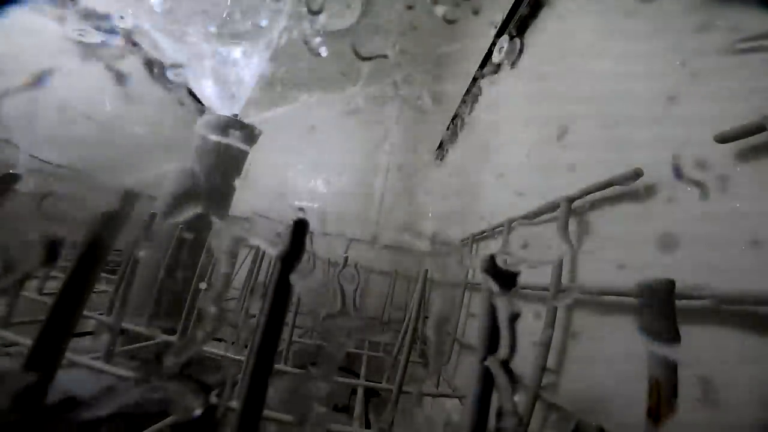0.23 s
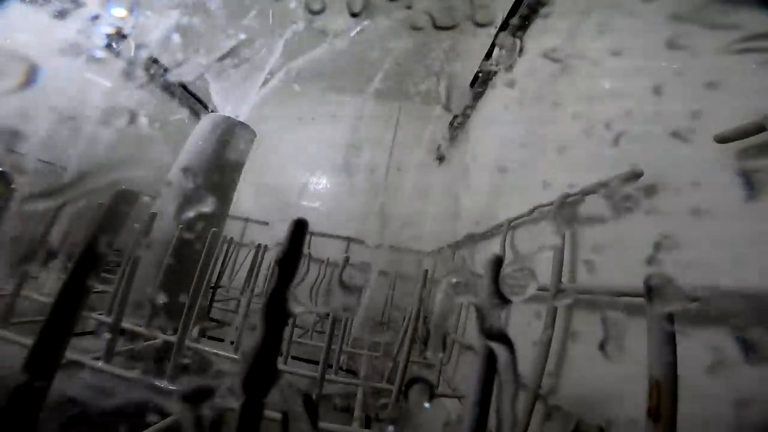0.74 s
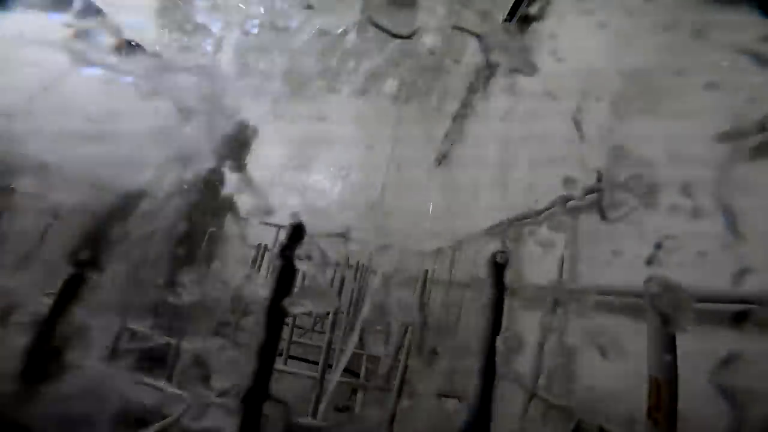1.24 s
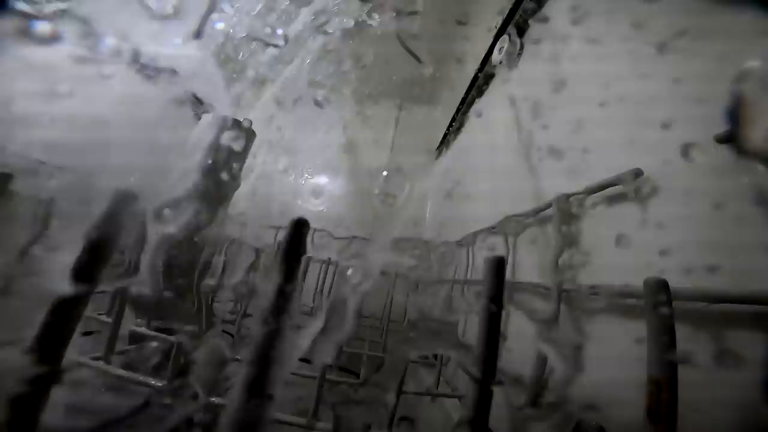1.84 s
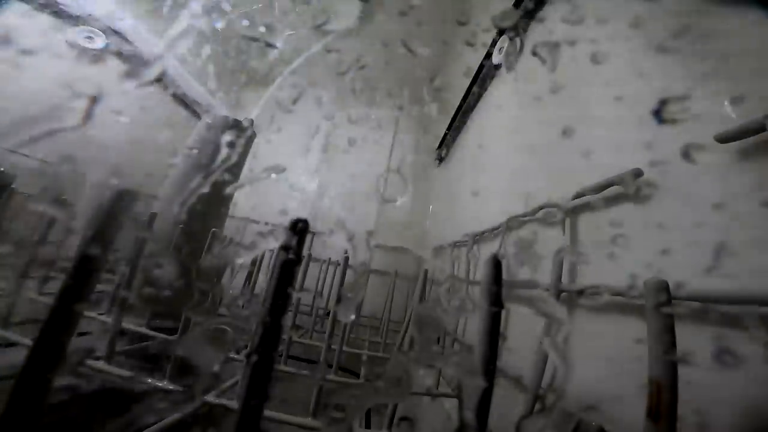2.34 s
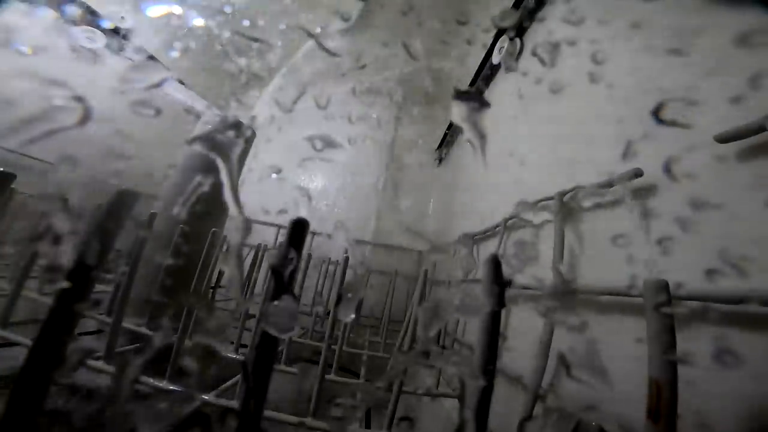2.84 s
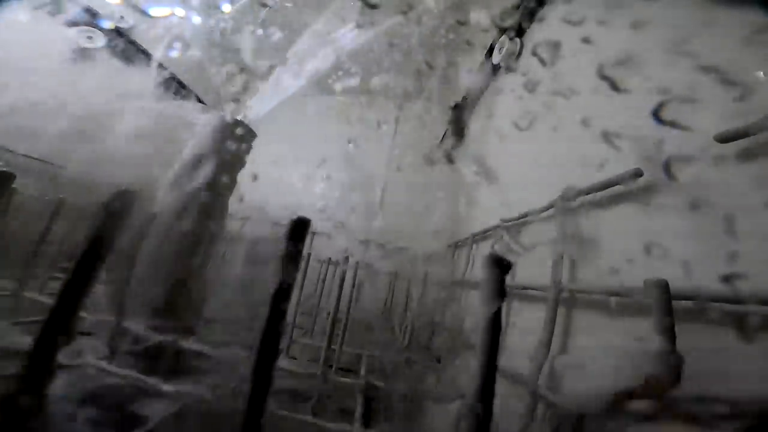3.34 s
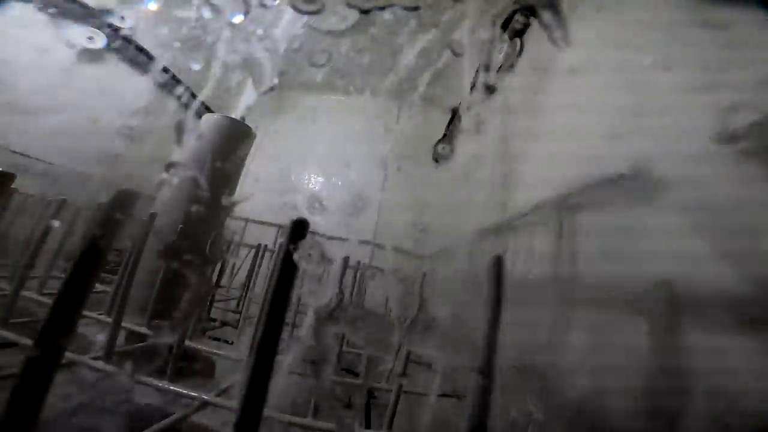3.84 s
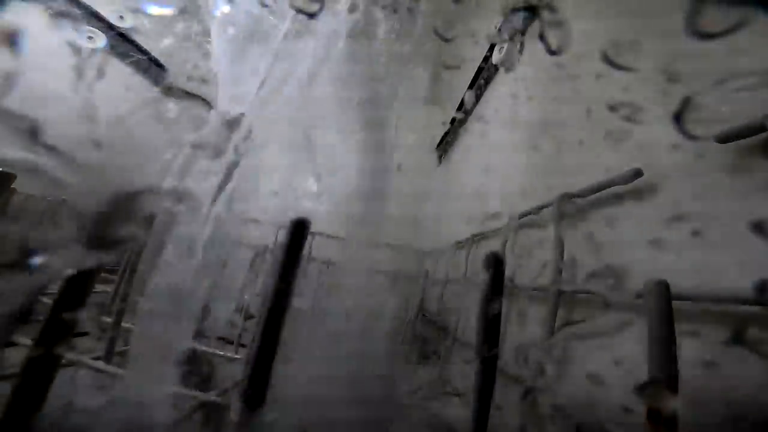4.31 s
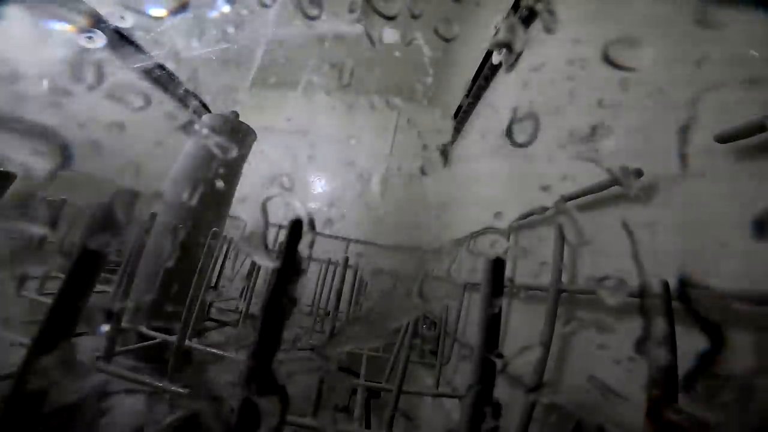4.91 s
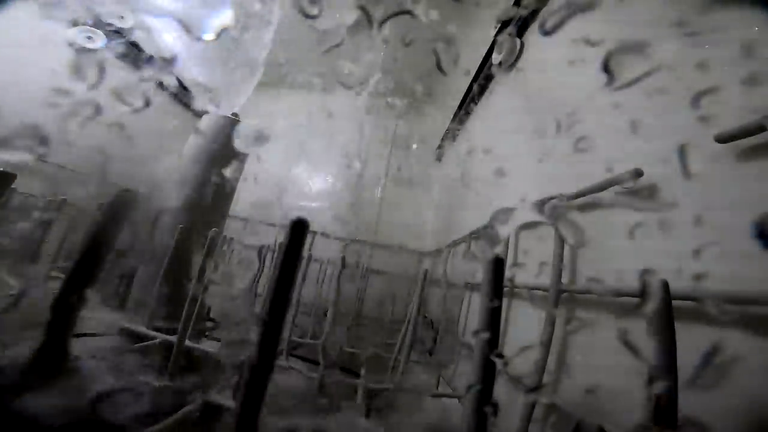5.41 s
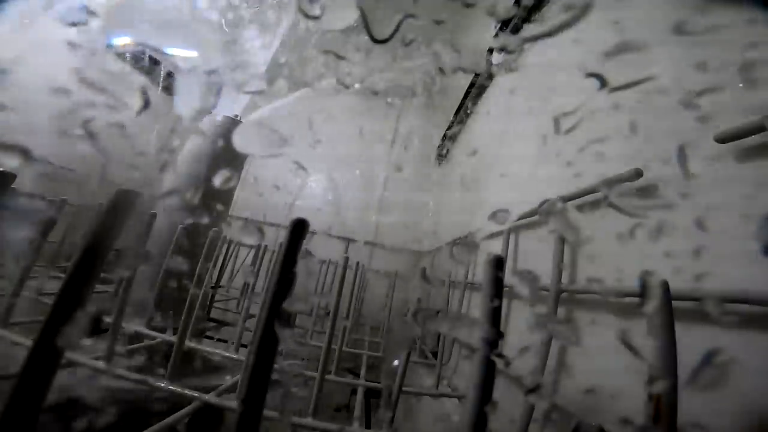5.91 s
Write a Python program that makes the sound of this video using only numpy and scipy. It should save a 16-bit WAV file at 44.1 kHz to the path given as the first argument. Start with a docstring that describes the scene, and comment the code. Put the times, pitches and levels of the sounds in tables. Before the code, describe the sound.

From inside a running dishwasher, a low wavering pump hum and tub rumble under dense spray patter, with wet plops and sharp gouts smacking the housing.

```python
"""Inside a running dishwasher

We listen through a watertight camera housing in the rack. Wavering tones make the pump hum and whine;
noise and random drops, passed through resonances, make the tub rumble, the walls drum and the wash rush.
Coloured drops make the spray, which swells as an arm turns and shifts as jets sweep close.
Short tones and noise bursts make plops, bubbles, clicks, gushes and gouts that splat and ring."""
import sys
import numpy as np
from scipy import signal
from scipy.fft import rfft, irfft
from scipy.io import wavfile
from scipy.ndimage import map_coordinates

SR = 44100
rng = np.random.default_rng(int(sys.argv[2]) if len(sys.argv) > 2 else 0)


def generate_wav(signal):
    """Clip the signal to [-1, 1] and save it as 16-bit WAV at the path in sys.argv[1]."""
    frames = np.transpose(np.atleast_2d(signal))
    scaled = np.clip(frames, -1, 1) * 32767
    pcm = np.round(scaled).astype(np.int16)
    wavfile.write(sys.argv[1], SR, pcm)


N = 271656
TIME = np.arange(N) / SR

# Pump tones, before they waver: (pitch [Hz], level against the hum [dB])
PUMP_TONES = [(120.3, 0.5), (60.34, -12)]
# The hum level rises and falls unevenly: (time [s], level [dB])
HUM_LEVELS = [(0.0, -31), (0.6, -34), (1.03, -28.5), (1.1, -31.5), (2.74, -35), (3.84, -29), (4.3, -34),
              (5.65, -37.5), (5.75, -32), (5.95, -42.5), (6.06, -32.5), (6.16, -35.5)]
# The impeller whine clears when the pump runs freely: (time [s], level [dB])
WHINE_LEVELS = [(0, -49.5), (1.2, -48.5), (2.4, -53), (4.4, -54.5), (4.849, -48.5), (6.16, -50.5)]
# Tub and rack resonances: (pitch [Hz], width [Hz], gain against each other [dB])
TUB_MODES = [(39, 3.7, 0), (60.1, 5.6, -6), (78.3, 20, -7), (102, 34, -14.5)]
# Water sloshes in the bottom of the tub: (time [s], half length [s], rise [dB])
SLOSHES = [(0.03, 0.045, 12), (2.007, 0.2, 7), (2.744, 0.078, 4.5), (4.64, .09, 5), (5.77, 0.22, 6)]
# Wall panel resonances: (pitch [Hz], width [Hz], gain against each other, before it wanders [dB])
WALL_MODES = [(142.1, 11, 3.5), (161.3, 7.7, 8), (180, 39.6, -1.5), (219.7, 30.6, -4.5),
              (263.6, 19.8, -1.5), (289.7, 64, -7), (388.6, 54.7, -4.5)]
# Resonances of the wash, before they slide and wander:
# (pitch [Hz], width [Hz], gain against each other [dB])
WASH_MODES = [(494, 56, -2), (584, 68, 2.5), (685.6, 39, 0), (826, 81, -7)]
# A jet sweeps close; a negative rise is a dip, and the mist takes only a share of the spray rise:
# (time [s], half length [s], spray rise [dB], wash rise [dB])
SWEEPS = [(0.06, 0.019, -3, 11.5), (0.4, 0.09, 3.5, -4), (0.617, 0.21, 2.5, 5.5), (1.475, 0.047, 2.5, 9),
          (1.654, 0.085, 2.5, 1), (2.407, 0.12, 3.5, 0.5), (3.245, 0.098, 1.5, 3.5), (3.634, 0.14, 2, 5),
          (3.79, 0.13, 0.5, -5.5), (4.31, 0.21, 5, 1.5), (4.558, 0.069, 0.5, 8), (4.732, 0.078, 6.5, 2),
          (6.02, 0.33, 5.5, 4)]
# The jets point away and the water thins; layers may scale the dip:
# (time [s], half length [s], dip [dB])
LULLS = [(4.203, 0.079, -4), (5.205, 0.35, -3.5)]
# Colour of the spray through the housing: (pitch [Hz], gain [dB])
SPRAY_COLOUR = [(700, -9), (1000, 0), (1280, 2.5), (1400, 5), (1580, 9.5), (1740, -2), (2000, 1),
                (2400, -3.5), (2700, -10), (3300, -24.5)]
# Colour of fine drops on the housing: (pitch [Hz], gain [dB])
MIST_COLOUR = [(1000, 3), (2400, 10.5), (3700, -1), (4450, 2.5), (5100, -7), (6000, -11), (7300, -9.5),
               (8600, -14), (9900, -25.5), (10900, -19), (12400, -27), (14200, -36)]
# Colour of a bursting gout: (pitch [Hz], gain [dB])
SPLASH_COLOUR = [(450, 9), (950, -10), (1400, 10), (2300, 5), (3200, -0.5), (3800, -4), (4500, -4),
                 (6000, -17.5), (8500, -19), (9900, -31), (12300, -29), (14500, -42)]
# Sheets of a jet brush the housing; gushes() trims the levels:
# (time [s], level before the trim [dB], swell time [s])
GUSHES = [(0.0604, -28, 0.0098), (0.595, -50, 0.0067), (1.63, -40, 0.016), (1.715, -43, 0.02),
          (3.22, -39.5, 0.033), (3.31, -35, .004), (3.6, -31, 0.005), (3.67, -38, 0.04), (3.81, -52, 0.028),
          (4.045, -35.5, 0.03), (4.176, -37, 0.016), (4.2584, -34, 0.01), (4.364, -32, 0.0093),
          (4.613, -28, 0.012), (4.675, -39, 0.0083), (4.728, -30, 0.018)]
# Sharp bright clicks, alone or at the contact of a gout, each peaking FLATTEN_S after its time;
# ticks() trims the levels: (time [s], level before the trim [dB])
TICKS = [(0.052, -42), (0.7012, -41), (0.914, -38.5), (1.46, -53), (1.5034, -38), (2.0305, -43),
         (2.5442, -45), (3.1821, -43.5), (3.2815, -40), (3.309, -39), (3.5425, -45), (3.5995, -50),
         (3.696, -43.5), (4.0845, -40), (4.3745, -45), (4.394, -44), (5.2246, -41), (5.268, -51),
         (5.5429, -40), (5.733, -46.5), (5.866, -45)]
# Gouts and beads first touch the housing; splats() trims the levels:
# (time [s], ring level before the trim [dB], ring pitch at the peak [Hz], splash level before the trim [dB])
SPLATS = [(0.0594, -39, 1954, -40.5), (0.647, -24.5, 1526, -56), (1.36, -28, 1530, -47),
          (1.3712, -22.5, 1544, -47), (1.4457, -19, 1394, -40), (1.614, -25, 1400, -44),
          (1.632, -21, 1402, -38.5), (1.6476, -37, 3600, -45), (2.026, -27, 1430, -38.5),
          (2.1725, -33, 1450, -48), (2.179, -19.5, 1330, -42), (2.2009, -18.5, 1403, -47),
          (2.2017, -27, 2350, -51), (2.4095, -25, 1402, -58), (2.5262, -28, 1367, -41.5),
          (3.182, -24, 1480, -44), (3.282, -26, 1312, -39), (3.308, -35, 3660, -36), (3.6, -35, 5000, -39),
          (3.6197, -29, 4500, -49), (3.629, -31, 1695, -43), (3.6368, -15.5, 1295, -37.5),
          (3.6777, -36, 2400, -37.5), (3.7289, -17.5, 1297, -42.5), (3.7627, -23.5, 1427, -53),
          (3.7885, -27, 2400, -31.5), (3.8147, -33, 1625, -48), (3.8258, -27, 2820, -35),
          (3.841, -23, 1310, -39), (3.8735, -26.5, 3000, -35.5), (3.8828, -33, 4280, -46),
          (3.924, -23.5, 1256, -43), (3.9936, -30, 1647, -35), (4.0224, -16.5, 1340, -46),
          (4.032, -20, 1373, -54), (4.0386, -33.5, 5000, -38), (4.058, -23, 1573, -36),
          (4.0897, -19.5, 2290, -34), (4.1718, -24.5, 1420, -46), (4.175, -22, 1990, -39.5),
          (4.249, -30, 3500, -44), (4.262, -35, 4000, -45), (4.351, -28, 1476, -40),
          (4.3654, -24, 2045, -40.5), (4.604, -24, 1580, -48), (4.6156, -16, 1680, -31.5),
          (4.718, -20, 1590, -51), (4.727, -23.5, 1947, -43), (5.0454, -23, 1340, -58),
          (5.057, -17.5, 1420, -43), (5.225, -17.5, 1374, -56), (5.268, -21, 1300, -42.5),
          (5.4607, -38, 4850, -53), (5.542, -23, 1275, -38), (5.946, -19.5, 1280, -50),
          (5.9492, -17.5, 1355, -40.5), (6.0213, -23, 1500, -47)]

WHINE_HZ = 407.7
# levels before each layer's swells and dips
CHURN_DB, DRUM_DB, WASH_DB, SPRAY_DB, MIST_DB = -38.5, -37, -49, -46, -51
# one arm throws spray at the housing each time it comes round
SPRAY_PERIOD_S, SPRAY_PEAK_S, SPRAY_SWING_DB = 1.865, 1.5, 1.9
# a lump of water presses hardest this long after it first touches
FLATTEN_S = 0.001486
TOP_HZ = 15000


def undb(db):
    """Turn decibels into a gain."""
    return 10 ** (np.asarray(db) / 20)


def unit(x):
    """Scale a sound to an average (rms) strength of 1."""
    return x / np.sqrt(np.mean(x ** 2))


def walk(rate):
    """A random wander with spread 1 that changes direction about rate times a second."""
    steps = rng.standard_normal(1024)
    return unit(np.interp(TIME * 2 * rate, np.arange(len(steps)), steps))


def pump(flutter_db=0.85, tone_waver_rad=0.18, whine_waver_rad=0.19):
    """Motor tones waver in phase and strength with the water load, beside an impeller whine."""
    tones = 0
    for hz, db in PUMP_TONES:
        phase = 2 * np.pi * hz * TIME + tone_waver_rad * walk(2)
        tones = tones + undb(db + flutter_db * walk(11)) * np.sin(phase)
    hum = tones * undb(np.interp(TIME, *np.transpose(HUM_LEVELS)))
    whine_db = np.interp(TIME, *np.transpose(WHINE_LEVELS))
    whine = undb(whine_db) * np.sin(2 * np.pi * WHINE_HZ * TIME + whine_waver_rad * walk(2.7))
    # a sine of height sqrt(2) has rms 1
    return np.sqrt(2) * (hum + whine)


def resonate(x, hz, width):
    """A resonance with steep skirts, made of two equal filters; gain 1 at its centre."""
    # two passes narrow the peak, so each one starts out wider
    b, a = signal.iirpeak(hz, hz / (1.55 * width), fs=SR)
    once = signal.lfilter(b, a, x)
    return signal.lfilter(b, a, once)


def passing(at, half_s):
    """A smooth swell to 1 and back."""
    return np.exp(-((TIME - at) / half_s) ** 2)


def tub():
    """Churning water, made of noise, shakes the lowest resonances of the tub."""
    rumble = 0
    for hz, width, db in TUB_MODES:
        rumble = rumble + undb(db) * resonate(rng.standard_normal(N), hz, width)
    slosh_db = sum(db * passing(at, half_s) for at, half_s, db in SLOSHES)
    return unit(rumble) * undb(CHURN_DB + slosh_db)


def drops(rate, spread_db):
    """Random impacts, about rate a second, of uneven size and either sign."""
    size = undb(spread_db * np.minimum(rng.exponential(size=N), 4))
    hit = rng.random(N) < rate / SR
    return unit(hit * size * rng.choice([-1, 1], N))


def lull():
    """Dip of the falling water while the jets point away, in dB."""
    return sum(db * passing(at, half_s) for at, half_s, db in LULLS)


def walls(wander_db=1, lull_share=1.1):
    """Jets break into lumps that drum on the panels; the strength of each resonance wanders."""
    drumming = 0
    for hz, width, db in WALL_MODES:
        lumps = drops(rate=900, spread_db=1.5)
        drumming = drumming + undb(db + wander_db * walk(4.5)) * resonate(lumps, hz, width)
    return unit(drumming) * undb(DRUM_DB + lull_share * lull())


def drift(x, share, rate):
    """Pitches slide up and down, typically by this share, as the water film changes."""
    places = np.arange(N) + np.cumsum(share * walk(rate))
    return map_coordinates(x, [places], mode="mirror")


def wash_flow():
    """Water running over the rack as the jets sweep close, in dB."""
    return sum(db * passing(at, half_s) for at, half_s, _, db in SWEEPS)


def wash(lull_share=2.0, wander_db=1.4):
    """Sheets of water run over the rack: a hollow rush whose resonances swell and slide."""
    rush = 0
    for hz, width, db in WASH_MODES:
        water = drops(rate=1000, spread_db=3.0)
        rush = rush + undb(db + wander_db * walk(4)) * resonate(water, hz, width)
    sliding = unit(drift(rush, share=0.025, rate=2))
    return sliding * undb(WASH_DB + wash_flow() + lull_share * lull())


def colour(x, points):
    """Filter by a curve of (pitch [Hz], gain [dB]) points that falls away beyond its ends."""
    hz = np.arange(N // 2 + 1) * SR / N + 1e-3  # the tiny offset avoids log(0)
    at, db = np.transpose(points)
    ends = np.minimum(hz / at[0], 1) ** 3 * np.minimum(at[-1] / hz, 1) ** 3
    gain = undb(np.interp(np.log(hz), np.log(at), db))
    return irfft(rfft(x) * ends * gain, N)


def reflect(x, decay_s, wet_db):
    """The steel tub is a small hard box: a short dense echo builds up and lightly combs the sound."""
    t = np.arange(4096) / SR
    tail = rng.standard_normal(len(t)) * t * np.exp(-t / decay_s)
    echo = signal.fftconvolve(x, tail / np.linalg.norm(tail))[:N]
    return x + undb(wet_db) * echo


def turn(period_s, peak_s):
    """A steady rotation: 1 when it faces the housing, -1 half a period later."""
    return np.cos(2 * np.pi * (TIME - peak_s) / period_s)


def spray_flow():
    """Spray reaching the housing, as a change in dB: the turning arm and the close sweeps."""
    close = sum(db * passing(at, half_s) for at, half_s, db, _ in SWEEPS)
    return SPRAY_SWING_DB * turn(SPRAY_PERIOD_S, SPRAY_PEAK_S) + close


def shifting_echo(x):
    """Water heard with its echo in the tub, the pitches sliding as the water moves."""
    return unit(drift(reflect(x, decay_s=0.0042, wet_db=-9.5), share=0.04, rate=5))


def spray(surge_db=2.0, flicker_db=1.25, mist_share=0.53, patter_lull_share=0.62, mist_lull_share=1.0):
    """Dense patter and finer mist, both made of random drops, come in quick uneven surges."""
    patter = shifting_echo(colour(drops(rate=600, spread_db=0.4), SPRAY_COLOUR))
    mist = shifting_echo(colour(drops(rate=9000, spread_db=-0.5), MIST_COLOUR))
    flow_db, lull_db = spray_flow(), lull()
    patter_db = SPRAY_DB + flow_db + patter_lull_share * lull_db + surge_db * walk(22)
    mist_db = MIST_DB + mist_share * flow_db + mist_lull_share * lull_db + flicker_db * walk(45)
    return patter * undb(patter_db) + mist * undb(mist_db)


def contact(t, rise, fall):
    """Force of a lump of water: it builds as the lump flattens, then lets go; peak 1 at t = 0."""
    u = t / np.where(t < 0, rise, fall)
    return np.exp(1 - np.sqrt(1 + u ** 2))


def add(out, at, sound):
    """Mix a short sound in, centred on a time."""
    start = int(at * SR) - len(sound) // 2
    lo, hi = max(start, 0), min(start + len(sound), N)
    out[lo:hi] += sound[lo - start:hi - start]


def plop(hz, cycles):
    """One drop: a few cycles of tone that swell and die."""
    t = np.arange(-512, 512) / SR
    swell = contact(t, cycles / hz, cycles / hz)
    return swell * np.sin(2 * np.pi * (hz * t + rng.random()))


def plops(plop_db=-6.0, spread_db=3.5, clump_db=2.5, fall_db=-3.0, cycles=2, low_hz=1280, span=1.19,
          count=1300):
    """Single drops burst throughout, louder in clumps; higher ones tend to be quieter and are shorter."""
    out = np.zeros(N)
    flow_db = SPRAY_DB + spray_flow() + clump_db * walk(7.9)
    for when, pitch, size in rng.random((count, 3)):
        octaves = span * pitch ** 2  # squaring favours low pitches
        size_db = spread_db * min(-np.log(1 - size), 4)  # a few drops are much louder
        db = flow_db[int(when * N)] + plop_db + fall_db * octaves + size_db
        add(out, when * N / SR, undb(db) * plop(low_hz * 2 ** octaves, cycles))
    return out


def bubbles(bubble_db=2.0, spread_db=2.5, fall_db=-6, low_hz=1450, span=1.0, cycles=13, rise_per_s=2.2,
            count=240):
    """Trapped air rings in the running film of water, each bubble rising in pitch as it fades."""
    t = np.arange(-2048, 2048) / SR
    out = np.zeros(N)
    flow_db = SPRAY_DB + spray_flow() + lull()
    for when, pitch, size in rng.random((count, 3)):
        octaves = span * pitch ** 2
        hz = low_hz * 2 ** octaves
        size_db = spread_db * min(-np.log(1 - size), 2)
        db = flow_db[int(when * N)] + bubble_db + fall_db * octaves + size_db
        tone = np.sin(2 * np.pi * hz * (t + rise_per_s * t ** 2 / 2))
        add(out, when * N / SR, undb(db) * contact(t, 1 / hz, cycles / hz) * tone)
    return out


def flecks(fleck_db=-61, spread_db=4.0, rate=70):
    """Stray droplets click on the housing at random, harder when the spray is thick."""
    droplets = colour(drops(rate=rate, spread_db=spread_db), MIST_COLOUR)
    clicks = np.gradient(droplets)  # the slope of a sound is brighter than the sound
    return unit(clicks) * undb(fleck_db + spray_flow() + lull())


def gushes(gush_db=-7, spread_db=5.0, cutoff_share=0.31):
    """A jet brushes past: a ragged burst of drops that builds and breaks off faster."""
    t = np.arange(-8192, 8192) / SR
    flow = np.zeros(N)
    for at, db, swell_s in GUSHES:
        add(flow, at, undb(db + gush_db) * contact(t, swell_s, cutoff_share * swell_s))
    return flow * unit(colour(drops(rate=550, spread_db=spread_db), SPLASH_COLOUR))


def cracks(hits, points, die_s):
    """Sharp noise clicks of one colour at (time [s], level over a millisecond [dB]), each one different."""
    t = np.arange(-256, 256) / SR
    out = np.zeros(N)
    for at, db in hits:
        burst = rng.standard_normal(len(t)) * contact(t, die_s, die_s / 2)
        add(out, at + FLATTEN_S, undb(db) * burst / np.linalg.norm(burst))
    # even out the strength of the colour filter
    filter_strength = np.linalg.norm(colour(signal.unit_impulse(N), points))
    return colour(out, points) * np.sqrt(SR / 1000) / filter_strength


def ticks(tick_db=1.0):
    """Sharp bright clicks, alone or at the contact of a gout: noise in the drop colour, tilted to treble."""
    bright = [(hz, db + 20 * np.log10(hz)) for hz, db in MIST_COLOUR]
    return undb(tick_db) * cracks(TICKS, bright, die_s=0.0007)


def splats(ring_db=-4.0, ring_rise_s=0.00099, ring_fall_s=0.0012, glide=0.0306, splash_db=4,
           splash_s=0.0017, crack_db=5, light_hz=1100):
    """Each gout cracks against the damped housing, which rings for a few cycles while the water bursts."""
    t = np.arange(-1024, 1024) / SR
    rings, force = np.zeros((2, N))
    for at, db, hz, burst_db in SPLATS:
        # each ring glides slightly up or down, at random
        pitch = hz * (1 + glide * rng.choice([-1, 1]) * np.tanh(t / ring_fall_s))
        tone = np.sin(2 * np.pi * (np.cumsum(pitch) / SR + rng.random()))
        ring = undb(db + ring_db) * contact(t, ring_rise_s, ring_fall_s) * tone
        add(rings, at + FLATTEN_S, ring)
        add(force, at + FLATTEN_S, undb(burst_db + splash_db) * contact(t, splash_s, splash_s))
    splash = force * unit(colour(rng.standard_normal(N), SPLASH_COLOUR))
    crack_hits = [(at, burst_db + crack_db) for at, _, _, burst_db in SPLATS]
    splash += cracks(crack_hits, SPLASH_COLOUR, die_s=0.00053)
    # a single gout is too light to thump
    no_thump = signal.butter(4, light_hz, "high", fs=SR, output="sos")
    splash = signal.sosfilt(no_thump, splash)
    return rings + reflect(splash, decay_s=0.0052, wet_db=-13)


def spatter(drop_db=-3.0, fall_db=-4.0, scatter_s=0.012, low_hz=1400, span=2.61, cycles=2.1, count=7):
    """Smaller drops land just before or after each gout, louder the more it bursts."""
    out = np.zeros(N)
    for at, _, _, burst_db in SPLATS:
        lags = scatter_s * rng.standard_normal(count)
        heights = span * rng.random(count)  # octaves above the lowest pitch
        for lag, octaves in zip(lags, heights):
            db = burst_db + drop_db + fall_db * octaves
            add(out, at + lag, undb(db) * plop(low_hz * 2 ** octaves, cycles))
    return out


def scene():
    """Machine and water around one microphone."""
    machine = pump() + tub() + walls()
    shower = wash() + spray() + plops() + bubbles() + flecks()
    hits = gushes() + ticks() + splats() + spatter()
    return (machine + shower + hits)[None]


def record(dry):
    """The camera cuts the top of the treble."""
    treble_cut = signal.ellip(8, 0.2, 70, TOP_HZ, fs=SR, output="sos")
    return signal.sosfilt(treble_cut, dry)


dry = scene()
out = record(dry)
generate_wav(out)
```